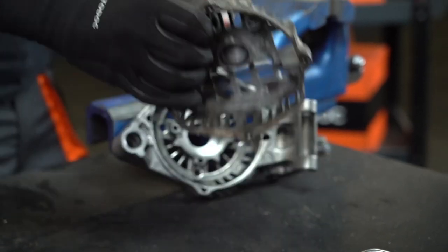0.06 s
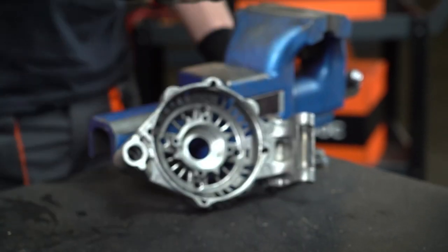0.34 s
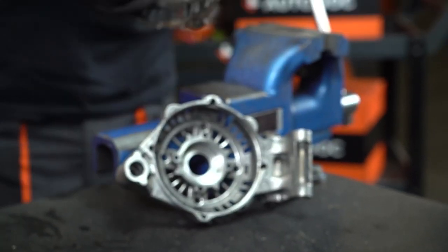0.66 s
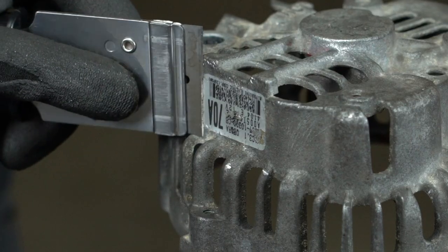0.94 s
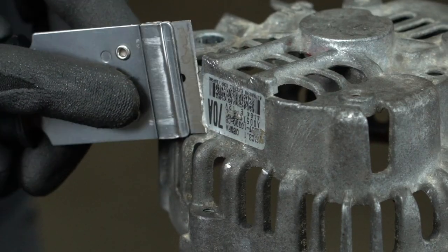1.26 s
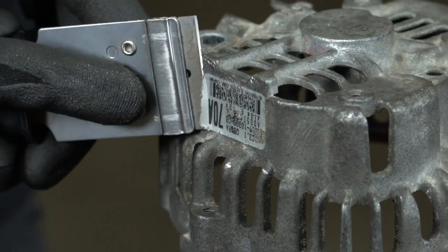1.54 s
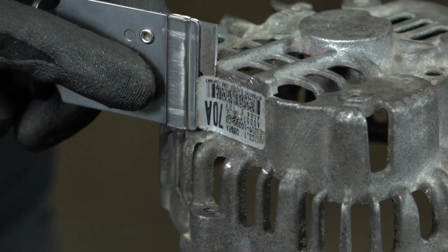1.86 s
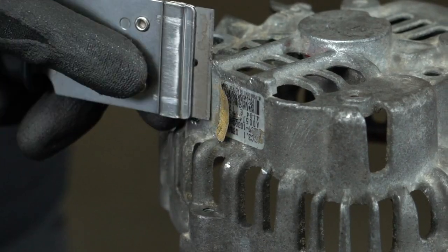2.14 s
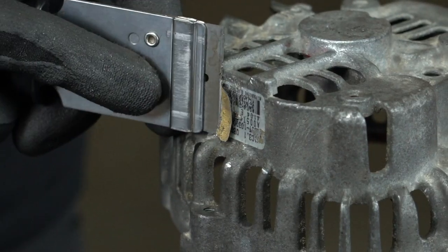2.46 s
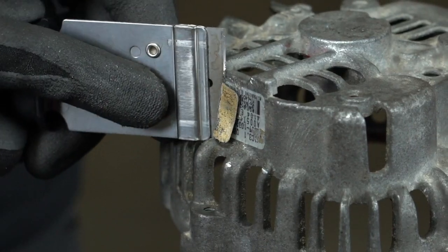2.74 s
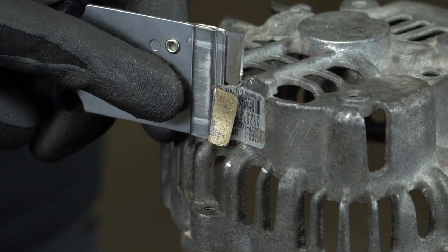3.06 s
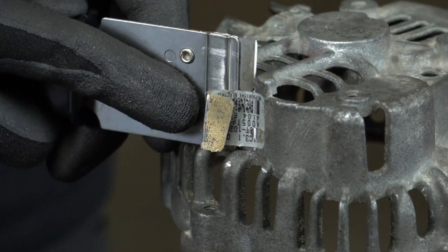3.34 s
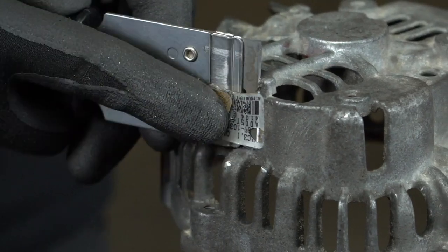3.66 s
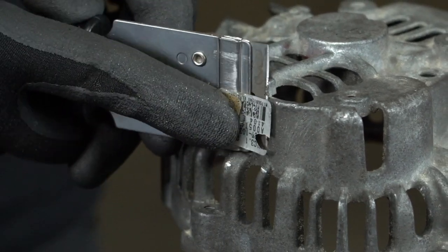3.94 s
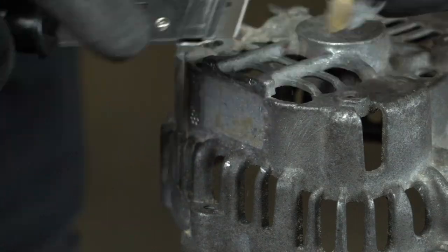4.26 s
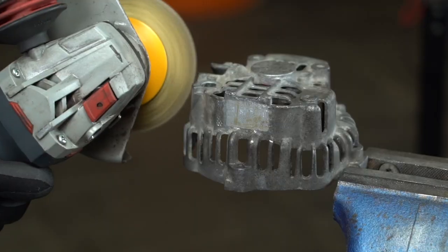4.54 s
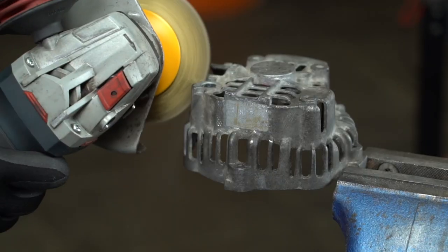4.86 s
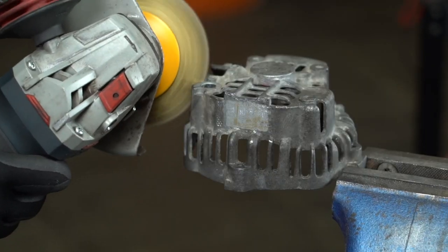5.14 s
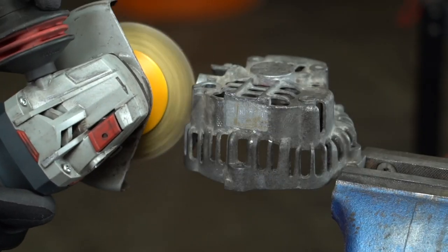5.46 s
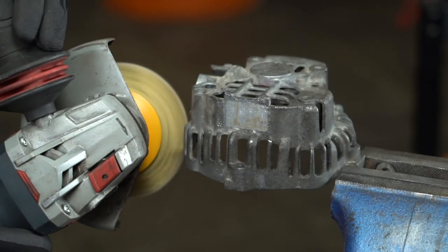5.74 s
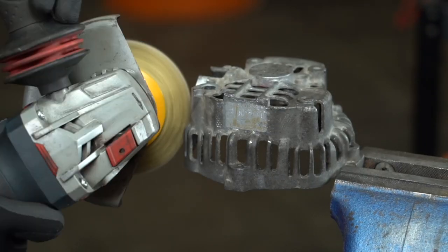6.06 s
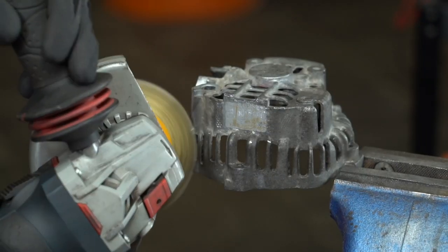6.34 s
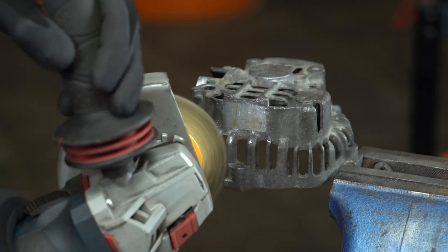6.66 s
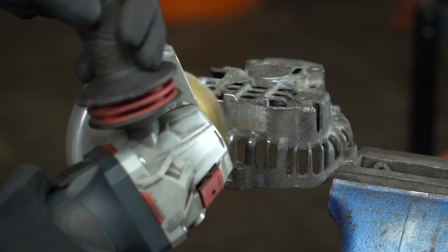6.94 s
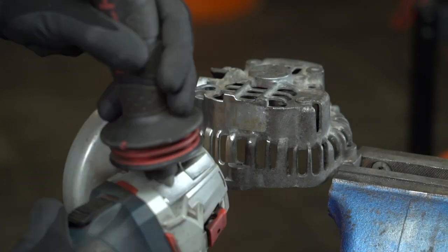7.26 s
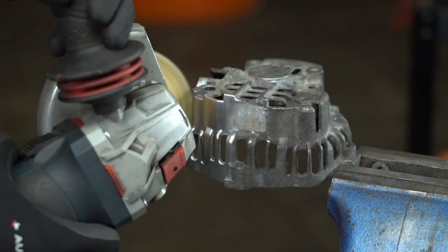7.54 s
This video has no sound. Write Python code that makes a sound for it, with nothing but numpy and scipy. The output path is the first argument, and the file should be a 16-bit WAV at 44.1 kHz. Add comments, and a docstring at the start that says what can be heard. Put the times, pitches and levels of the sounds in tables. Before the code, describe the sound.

A blade clicks and scratches a label off a metal housing, then an angle grinder's wire wheel scrubs the metal with a ringing rasp.

```python
"""Scraping and wire-brushing a casting

In a workshop with droning ventilation, a scraper blade clicks and scratches a label off a cast
aluminium housing. Then an angle grinder scrubs it with a wire wheel: thousands of wire tips a second
strike the casting, in bunches as the wheel turns, and make it ring; the colour shifts from rib to rib."""
import sys
import numpy as np
from scipy import signal
from scipy.fft import rfft, irfft
from scipy.io import wavfile
from scipy.ndimage import uniform_filter1d

SR = 44100
rng = np.random.default_rng(int(sys.argv[2]) if len(sys.argv) > 2 else 0)


def store_pcm(level_fs):
    """Save levels as 16-bit WAV."""
    pcm = np.round(np.clip(level_fs, -1, 1) * 32767).astype(np.int16)
    wavfile.write(sys.argv[1], SR, np.atleast_2d(pcm).T)


N = 339570
TIME = np.arange(N) / SR

# the housing's modes: (frequency [Hz], width [Hz], gain under the blade [dB], gain under the wheel [dB])
HOUSING_MODES = [(2915, 30, 3.5, -3), (3190, 22, 2, -1), (3360, 70, 3.5, -5), (3385, 16, -2, -8),
                 (3580, 42, -12, -9), (3720, 56, 2.5, -5), (4140, 50, -11, -7), (4790, 45, -7, -7),
                 (4985, 45, -2, -3), (5185, 55, 1.5, -11), (5313, 47, -7, 0), (5691, 60, -1.5, -7),
                 (5890, 24, -3, 2), (6375, 50, 3.5, 1), (6535, 34, -5, -7), (7000, 45, -5, -1),
                 (7375, 30, -8, 3), (8335, 40, 2, -1), (8930, 130, -2, -3), (9404, 39, -5, -5),
                 (10000, 48, -9, -12), (10570, 200, -9, -10), (11386, 45, -10, -1), (12000, 80, -14, -10),
                 (12520, 92, -12, -4.5), (12726, 45, -6, -2), (13351, 50, -17, -11), (13986, 55, -21, -14),
                 (14632, 45, -22, -7)]


def amp(db):
    """Decibels to linear gain."""
    return 10 ** (np.asarray(db) / 20)


def unit_rms(x):
    """Scales to rms 1."""
    return x / np.sqrt(np.mean(x ** 2) + 1e-20)


def spectrum_at(points, hz):
    """Interpolates an EQ curve on a log-frequency axis."""
    point_hz, db = np.transpose(points)
    return np.interp(np.log(hz + 1), np.log(point_hz + 1), db)


def add(mix, start_s, sound):
    """Drops a sound into the mix."""
    part = mix[round(start_s * SR):][:len(sound)]
    part += sound[:len(part)]


def colour(x, points, size=4096):
    """Minimum-phase EQ with the given curve."""
    log_gain = np.log(amp(spectrum_at(points, abs(np.fft.fftfreq(size, 1 / SR)))))
    taps = np.fft.ifft(np.exp(np.conj(signal.hilbert(log_gain)))).real
    return signal.oaconvolve(x, taps[:size // 2])[:len(x)]


def wander(rate_hz, length=N):
    """A random modulator of rms 1."""
    knots = rng.standard_normal(2048)
    return unit_rms(np.interp(TIME[:length] * rate_hz, np.arange(len(knots)), knots))


def gate(start, end, fade_s):
    """Fades in to 1 around start and out around end."""
    return np.clip(.5 + np.minimum(TIME - start, end - TIME) / fade_s, 0, 1)


def strikes(per_s, spread_db):
    """Tiny random impacts, a few much larger than the rest."""
    size = amp(spread_db * np.minimum(rng.exponential(1, N), 5))
    return unit_rms(size * rng.choice([-1, 1], N) * (rng.random(N) < per_s / SR))


def mode(x, hz, width):
    """One resonance with a peak gain of 1."""
    r = np.exp(-np.pi * width / SR)
    return 2 * signal.lfilter([1 - r], [1, -r * np.exp(2j * np.pi * hz / SR)], x).real


def steep_band(x, hz, width):
    """A steep resonance at hz, which may be a number or a curve."""
    turn = np.exp(2j * np.pi * np.cumsum(np.broadcast_to(hz, len(x))) / SR)
    r = np.exp(-np.pi * width / SR)
    return (turn * signal.lfilter([(1 - r) ** 2], [1, -2 * r, r * r], x / turn)).real


def ventilation(cut_s=0.74, cut_db=-16.5, fade_from_s=3.955, fade_s=0.46, floor_db=-45):
    """Air drones in the ducts over a diffuse rumble, a faint hiss and the fan's hum."""
    # EQ of the air's three layers and of its stereo side signal: (frequency [Hz], gain [dB])
    drone_eq = [(100, -27.5), (200, -12.5), (310, -7.5), (365, -2), (420, 1.5), (470, -4), (540, -13.5),
                (760, -13.5), (850, -5), (1000, -20.5), (1150, -18.5), (1800, -39.5), (3000, -40.5),
                (8000, -73.5)]
    rumble_eq = [(10, -2.5), (30, -3.5), (45, -6.5), (100, -6.5), (160, -14), (300, -19.5), (1000, -44)]
    hiss_eq = [(300, -4), (1500, 7.5), (3000, -0.5), (6000, -4.5), (10000, -7), (16000, -11.5)]
    side_eq = [(25, -15), (60, -12.5), (140, 3), (300, -21.5), (1500, -11.5), (5000, -1.5)]
    # the fan's tones: (frequency [Hz], relative level [dB])
    fan_hum = [(137, -61), (187, -60.5), (233, -59)]
    # the room tone starts a little louder, is cut down abruptly, faded back in,
    # then faded out before the grinder
    opening = np.clip((cut_s - TIME) / 0.0056 + .5, 0, 1)
    fade_in = np.clip(amp(cut_db) + (np.maximum(TIME - cut_s, 0) / 0.5244) ** 1.06, 0, 1)
    fade_out = np.clip(1 - (TIME - fade_from_s) / fade_s, 0, 1) ** 0.84
    level = opening * amp(1.3) + (1 - opening) * fade_in * fade_out + amp(floor_db)
    layers = (drone_eq, -49.5), (rumble_eq, -56.5 + 1.5 * opening), (hiss_eq, -65)
    mid, diffuse = (sum(amp(db) * unit_rms(colour(rng.standard_normal(N), eq)) for eq, db in layers)
                    for _ in range(2))
    side = colour(diffuse, side_eq)
    out = np.array([mid + side, mid - side])
    for hz, db in fan_hum:
        for channel in out:
            cycles = np.cumsum(hz + 1.58 * wander(12)) / SR
            channel += amp(db - 5) * (1 + .5 * wander(4.62)) * np.sin(2 * np.pi * cycles)
    return level * out


def blade_clicks(ring_db=-1.5, light_db=-41.5, light_cut_hz=2200, label_cut_hz=8200, size=8192):
    """The blade lets go with a snap, skids for a moment, rings the housing and knocks it in the vice."""
    # the blade catches on the casting and slips: (time [s], level over 5 ms [dB], skid decay [s])
    slips = [(0.9786, -47, .003), (0.982, -29, .005), (0.9837, -31.5, 0.0043), (1.088, -54, .004),
             (1.1261, -42.5, 0.0023), (1.146, -57, .001), (1.1946, -24.5, 0.0025), (1.951, -58.5, .003),
             (2.108, -40.5, .003), (2.756, -60, .003), (4.035, -52.5, 0.0023)]
    # the label's glue lets go in thin, bright snaps: (time [s], level over 5 ms [dB], skid decay [s])
    glue_snaps = [(2.158, -56, .001), (2.184, -62, .002), (3.747, -44.5, 0.0017), (3.7655, -39.5, 0.0015),
                  (3.95, -47, 0.0063), (3.968, -40, .002), (4.058, -58, .002), (4.217, -70, .001),
                  (4.281, -69.5, .001)]
    # EQ of a snap: (frequency [Hz], gain [dB])
    snap_eq = [(100, -9), (320, -6), (445, -3.5), (650, -5.5), (900, -6.5), (1900, -18.5), (2700, -11),
               (3350, -1), (3950, -4), (4800, 0), (5650, 1), (6400, -8), (8000, -7), (11400, -10),
               (13500, -15.5), (16000, -24.5)]
    # the whole part knocks in the vice: (frequency [Hz], t60 [s], level relative to the click [dB])
    knock_modes = [(430, 0.06, -11.5), (870, 0.057, -15), (1080, .04, -16.5)]
    out, t = np.zeros(N), np.arange(size) / SR
    bin_hz = np.fft.rfftfreq(size, 1 / SR)
    # bending waves in the thin blade: the treble arrives first, the rest a little later
    snap = irfft(np.exp(-4j * np.pi * 0.000396 * np.sqrt(bin_hz * 5000)), size)
    # a harder slip moves more of the low body: the low cut drops an octave per 5.5 dB above light_db
    events = [(s, db, skid, light_cut_hz * .5 ** (max(db - light_db, 0) / 5.5)) for s, db, skid in slips]
    events += [(*row, label_cut_hz) for row in glue_snaps]
    for start, db, skid_s, cut_hz in events:
        skid = 0.32 * rng.standard_normal(size) * np.exp(-t / skid_s)
        force = colour(snap + skid, snap_eq)
        ring = sum(amp(gain) * mode(force, hz, width) for hz, width, gain, _ in HOUSING_MODES)
        low_cut = signal.butter(3, cut_hz, "high", fs=SR, output="sos")
        click = signal.sosfilt(low_cut, force + amp(ring_db) * ring)
        add(out, start, amp(db) * click * np.sqrt(0.005 * SR / np.sum(click ** 2)))
    knock = sum(amp(db - 60 * t / t60) * np.sin(2 * np.pi * hz * t) for hz, t60, db in knock_modes)
    for start, db, _ in slips:
        add(out, start, amp(db) * knock)
    return out


def blade_strokes(from_s=0.83, freed_s=2.4, peel_s=(2.68, 3.5), lifted_s=3.17, to_s=4.1, ring_db=10):
    """Each push drags the edge over the rough casting and nudges it; in between it ticks over bumps."""
    # short pushes under the label: (time [s], level [dB])
    strokes = [(1.688, -62.5), (1.773, -61), (1.828, -55), (1.889, -54.5), (2.035, -55.5), (2.1, -60),
               (2.109, -44.5), (2.183, -55.5), (2.25, -52), (2.474, -57), (2.655, -66), (2.72, -68),
               (2.817, -56.5), (2.917, -61), (2.996, -59), (3.112, -58), (3.145, -66), (3.248, -59.5),
               (3.29, -65.5), (3.342, -54), (3.381, -59), (3.466, -58.5), (3.655, -61.5), (3.712, -56.5),
               (3.837, -57.5), (3.986, -50)]
    # EQ of the scratching edge: (frequency [Hz], gain [dB])
    scratch_eq = [(100, -17), (1100, 4.5), (2200, -12), (3300, -6), (4600, -3), (6500, -6.5), (7600, -11),
                  (9300, -9.5), (13000, -13), (16000, -24)]
    push = np.sqrt(sum(amp(db) ** 2 * np.exp(-((TIME - s) / .011) ** 2) for s, db in strokes))
    peel = amp(-69.5) * gate(*peel_s, fade_s=.11)  # a steadier rasp while the label peels
    drag = amp(-74.5) * gate(from_s, to_s, fade_s=.05)
    grit = unit_rms(amp(3 * wander(260)))  # the edge sticks and slips, so the grains come in clumps
    push_force = grit * (push + peel) * strikes(per_s=5400, spread_db=2.5)
    force = push_force + grit * drag * strikes(per_s=900, spread_db=4)
    scratch = colour(force, scratch_eq)
    # every push lands on another spot and favours other modes
    ring = sum(mode(scratch * amp(db + 3 * wander(11)), hz, width) for hz, width, db, _ in HOUSING_MODES)
    # wedged under the stuck label, the blade itself rings
    wedged = colour(push_force, scratch_eq) * gate(0, freed_s, fade_s=.3)
    ring += amp(7) * mode(wedged, hz=6380, width=110)
    scrape = force.std() * unit_rms(scratch + amp(ring_db) * ring)
    thud = amp(-7) * push * unit_rms(steep_band(rng.standard_normal(N), hz=130, width=130))
    # once lifted, the label crinkles with every push
    crinkle = unit_rms(steep_band(grit * rng.standard_normal(N), hz=8650, width=1700))
    label = amp(-6.5) * push * gate(lifted_s, to_s, fade_s=.3) * crinkle
    return scrape + label + thud


def wheel_contact(turns_per_s=50.4, waver_hz=0.707, throb=0.11, graze_throb=0.29, graze_end_s=4.88):
    """The pulsing grip of the uneven wheel: two proud tufts on opposite sides, never twice alike."""
    angle = 2 * np.pi * np.cumsum(turns_per_s + waver_hz * wander(3)) / SR
    tufts = np.exp(4.1 * np.cos(2 * angle + 0.36 * wander(80))) * amp(wander(100))
    # while the wheel only grazes the part, the tufts strike alone and it throbs deeply
    depth = throb + (graze_throb - throb) * gate(0, graze_end_s, fade_s=.25)
    wobble = 1 + 0.075 * np.cos(angle)
    flutter = amp(0.9 * wander(220))
    contact = abs(1 + depth * (tufts / tufts.mean() - 1)) * wobble * flutter
    return contact / np.sqrt(uniform_filter1d(contact ** 2, size=2205))  # levelled over 50 ms


def wire_wheel(start_s=4.418, bite_s=0.32, trim_db=-0.22, rasp_db=-4.3, ring_db=-5.5):
    """Wire tips strike in bunches as the wheel turns; they rasp and ring the housing."""
    # how hard the wheel is pressed on: (time [s], level [dB])
    pressure = [(4.44, -43.5), (4.54, -43.7), (4.74, -41.5), (4.86, -42.5), (4.91, -39.5), (4.975, -38.5),
                (4.995, -43), (5.24, -41), (5.39, -42.5), (5.8, -41), (5.875, -43), (5.9, -40.5),
                (6.21, -43.3), (6.28, -39.5), (6.32, -43), (6.52, -41), (6.7, -41.5), (7.45, -40.5),
                (7.58, -41), (7.7, -40)]
    # EQ of the wires' rasp and of its stereo side signal: (frequency [Hz], gain [dB])
    rasp_eq = [(1200, -27), (2500, -5), (3300, 0), (4200, 3), (5000, -2.5), (5900, 3), (6650, -2),
               (7600, 0.5), (9000, -4.5), (9650, -15), (10600, -5.5), (12600, -16.5), (13700, -17.5),
               (16000, -24.5)]
    side_eq = [(100, -27), (3000, -44), (6000, -6), (8500, -11), (10000, -9.5), (15000, 10)]
    press_db = np.interp(TIME, *np.transpose(pressure))
    level = amp(press_db + trim_db)
    contact = wheel_contact()
    tips, stray_tips = (contact * strikes(per_s=14000, spread_db=2.5) for _ in range(2))
    rasp, stray_rasp = (level * amp(rasp_db) * unit_rms(colour(x, rasp_eq)) for x in (tips, stray_tips))
    # the moving contact crosses each mode's nodes and bellies
    ring = unit_rms(sum(mode(stray_tips * amp(db + 4 * wander(16)), hz, width)
                        for hz, width, _, db in HOUSING_MODES))
    bite = np.clip((TIME - start_s) / bite_s, 0, 1) ** 2  # the ring builds as the wires bite
    metal = level * (amp(ring_db) * bite * ring + ribs(contact) + squeals(contact))
    load_db = press_db - press_db[TIME > start_s].mean()
    mid = rasp + metal + grinder_whirr(contact, stray_tips, load_db) + vice_shake()
    side = colour(stray_rasp, side_eq)  # short waves from the rim reach left and right differently
    attack = np.clip((TIME - start_s) / 0.0019, 0, 1)
    return np.array([mid + side, mid - side]) * attack


def grinder_whirr(contact, tips, load_db, whirr_db=-56, load_follow=0.65):
    """Motor and wheel whirr, louder under load, and the wire strikes ring the tool's own resonances."""
    # EQ of the low whirr: (frequency [Hz], gain [dB])
    whirr_eq = [(30, -45), (130, -22.5), (260, -17), (330, -6.5), (368, 0.5), (400, -0.5), (520, -7.5),
                (600, -4.5), (710, -10.5), (800, -5.5), (1080, -4.5), (1350, -11.5), (2000, -9),
                (5000, -30.5)]
    # narrow resonances of the running tool: (frequency [Hz], width per filter pass [Hz], level [dB])
    resonances = [(370.9, 14.5, -71.5), (813.4, 25, -71), (1056, 38, -71.5), (1777, 38, -67.5)]
    whirr = unit_rms(colour(np.sqrt(contact) * rng.standard_normal(N), whirr_eq))
    tones = sum(amp(db) * unit_rms(mode(mode(tips, hz, width), hz, width))
                for hz, width, db in resonances)
    return amp(whirr_db + load_follow * load_db) * whirr + tones


def ribs(contact, scatter=0.3, flicker_db=2.5, trim_db=-0.5):
    """Each rib's close modes pulse with the tufts; they swell, shift and fade as the wires slide by."""
    # the wheel bears on a rib or wall:
    # (start [s], end [s], centre [Hz], cluster width [Hz], relative level [dB])
    clusters = [(4.3, 5.56, 5400, 680, -6), (4.301, 5.38, 7520, 845, -10), (4.3, 5.606, 4576, 380, -7.5),
                (4.872, 5.06, 6200, 200, -14), (4.85, 5.35, 3730, 400, -15), (5.499, 6.05, 7070, 260, -10),
                (5.559, 6.23, 4660, 560, -8.5), (5.7, 5.89, 3560, 190, -8), (5.8, 6.02, 9000, 160, -10),
                (6.2, 7.3, 7160, 380, -7.5), (6.41, 7.26, 6280, 200, -11), (6.448, 6.63, 5660, 654, -7),
                (6.46, 6.85, 4800, 400, -9), (7.151, 7.53, 5550, 700, -7), (7.581, 7.8, 5550, 700, -16),
                (7.283, 7.8, 3340, 700, -15.5), (7.32, 7.53, 9100, 220, -12)]
    out = np.zeros(N)
    for start, end, hz, width, db in clusters:
        level = gate(start, end, fade_s=0.2)
        on = level > 0
        length = on.sum()
        ring = np.zeros(length)
        for offset in (-1, 0, 1):
            force = rng.standard_normal(length) * amp(flicker_db * wander(30, length))
            mode_hz = hz + width * scatter * (offset + .5 * wander(45, length))
            ring += steep_band(force, mode_hz, 0.41 * width)
        out[on] += amp(db + trim_db) * level[on] * unit_rms(ring * contact[on] ** 1.15)
    return out


def squeals(contact, waver_hz=17, flicker_db=2.8, trim_db=-1):
    """The wires stick and slip in step with one mode, so that it sings a rough, unsteady tone."""
    # the singing modes: (start [s], end [s], frequency [Hz], relative level [dB])
    singing_modes = [(4.68, 5.05, 7400, -22), (4.93, 5.36, 3206, -17), (5.44, 5.89, 2910, -10.5),
                     (6.219, 6.33, 2940, -12.5), (6.22, 6.36, 9040, -15), (6.33, 6.43, 2036, -13.5),
                     (6.3, 6.46, 3720, -13), (6.45, 6.68, 5900, -9), (6.85, 7.3, 5320, -14),
                     (7.28, 7.52, 5682, -17), (7.298, 7.7, 8332, -16)]
    out = np.zeros(N)
    for start, end, hz, db in singing_modes:
        level = gate(start, end, fade_s=0.09)
        on = level > 0
        cycles = np.cumsum(hz + waver_hz * wander(140, on.sum())) / SR
        tone = np.sin(2 * np.pi * cycles) * contact[on] * amp(flicker_db * wander(70.3, on.sum()))
        out[on] += amp(db + trim_db) * level[on] * unit_rms(tone)
    return out


def vice_shake(shake_hz=94, rest_db=-86):
    """A low, unsteady hum that swells whenever the clamped part shakes."""
    # bouts of shaking: (start [s], end [s], level [dB])
    shakes = [(4.86, 5.37, -71.5), (5.63, 5.92, -73), (7.12, 7.8, -86)]
    level = amp(rest_db) + sum(amp(db) * gate(start, end, fade_s=0.19) for start, end, db in shakes)
    sway = np.sin(2 * np.pi * np.cumsum(shake_hz + 6 * wander(30)) / SR)
    return level * unit_rms(sway * (1 + 0.4 * wander(22)))


def workshop(x, room_db=-22, t60=0.11, size=16384):
    """The work reaches left and right with slightly different colour, and a faint room tail follows."""
    # stereo balance: (frequency [Hz], left minus right [dB])
    balance = [(100, 3), (3000, -0.5), (5200, -0.5), (5800, 5.5), (7200, -5), (9000, -2), (10000, 5),
               (14000, -4.5)]
    hz, t = np.fft.rfftfreq(N, 1 / SR), np.arange(size) / SR
    channel_db = np.outer([.5, -.5], spectrum_at(balance, hz))
    direct = irfft(rfft(x) * amp(channel_db), N)
    room = rng.standard_normal((2, size)) * amp(-60 * t / t60)
    tail = signal.oaconvolve(x, room / np.linalg.norm(room[0]), axes=1)[:, :N]
    return direct + amp(room_db) * tail


def scene():
    """The work on the housing in the ventilated room."""
    return workshop(blade_clicks() + blade_strokes() + wire_wheel()) + ventilation()


def record(dry, cutoff_hz=15950):
    """A steep low-pass takes off the highest treble."""
    low_pass = signal.firwin(511, cutoff_hz, window=("kaiser", 9), fs=SR)
    return signal.oaconvolve(dry, low_pass[None], "same")


dry = scene()
out = record(dry)
store_pcm(out)
```